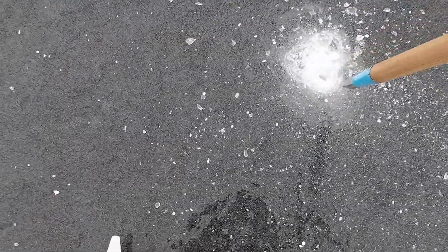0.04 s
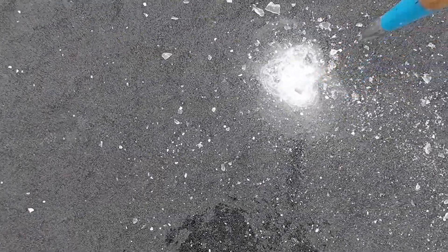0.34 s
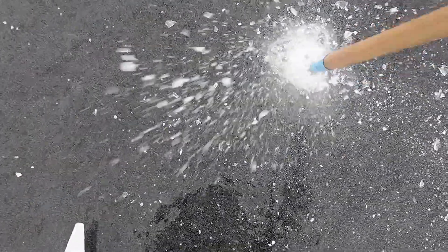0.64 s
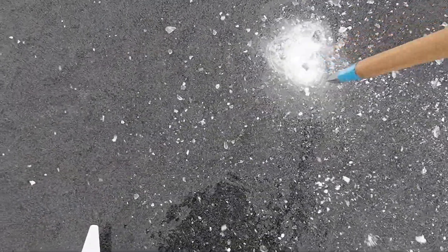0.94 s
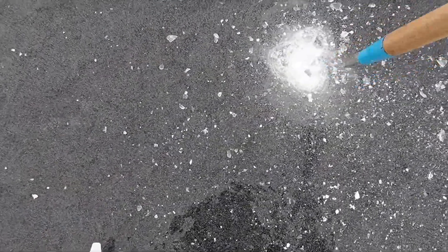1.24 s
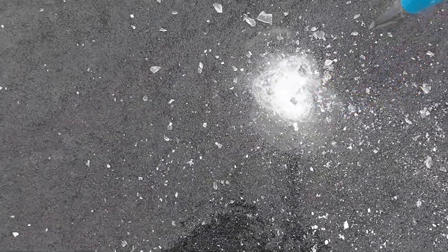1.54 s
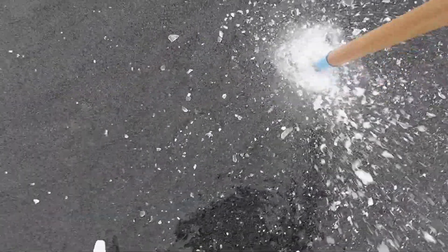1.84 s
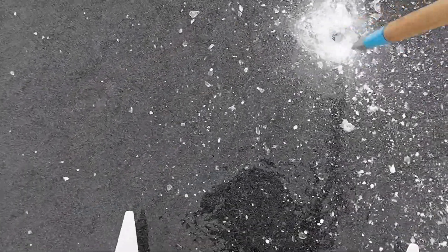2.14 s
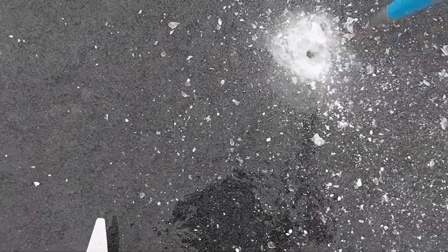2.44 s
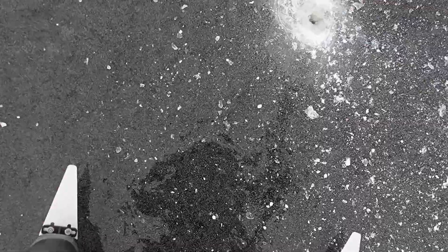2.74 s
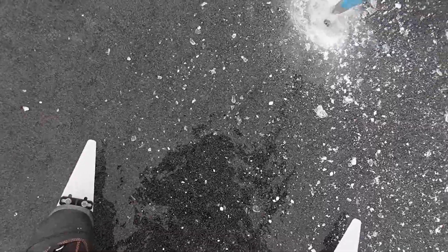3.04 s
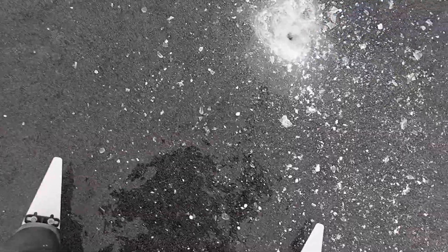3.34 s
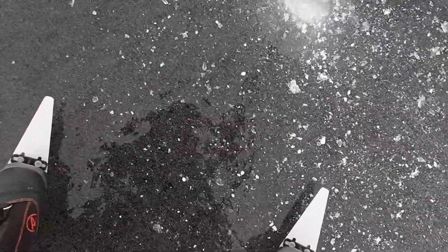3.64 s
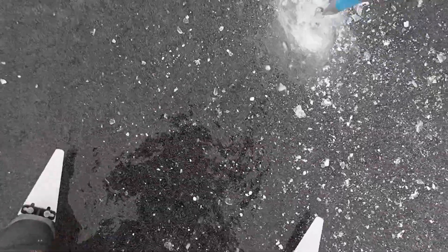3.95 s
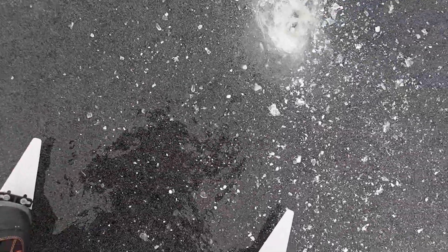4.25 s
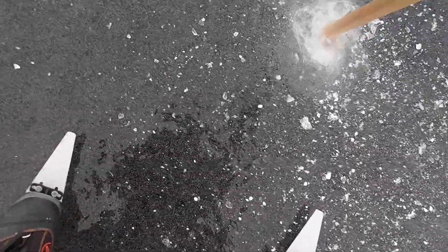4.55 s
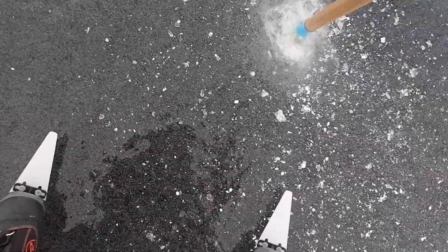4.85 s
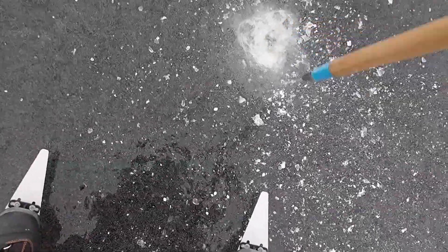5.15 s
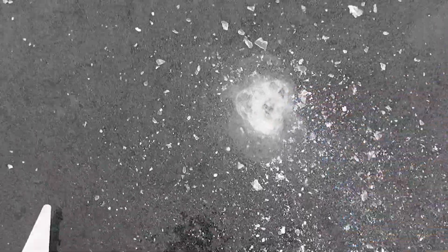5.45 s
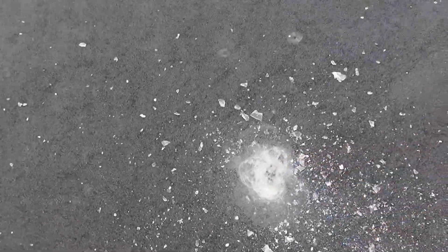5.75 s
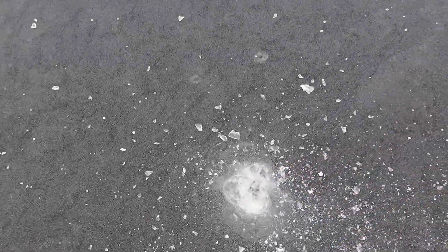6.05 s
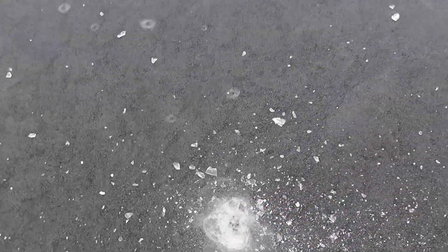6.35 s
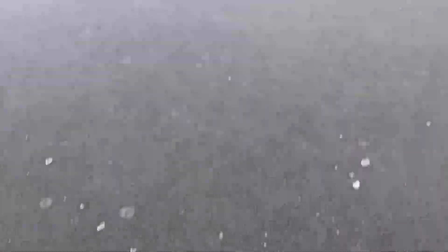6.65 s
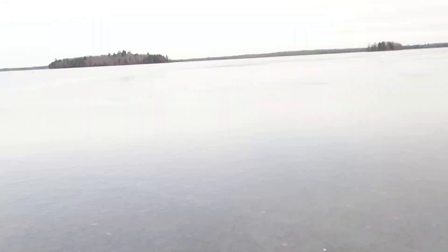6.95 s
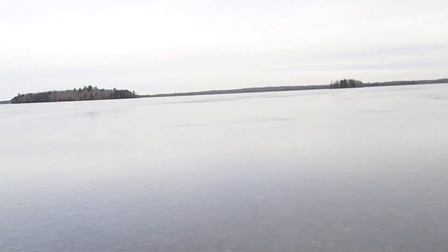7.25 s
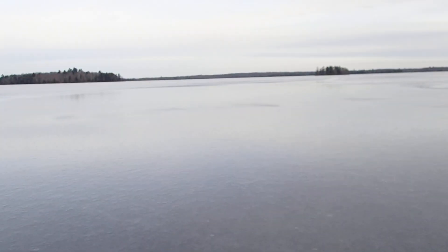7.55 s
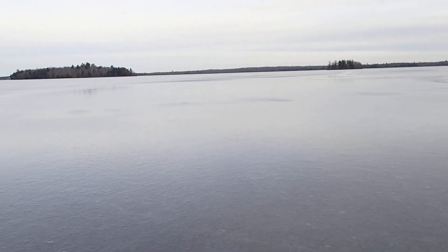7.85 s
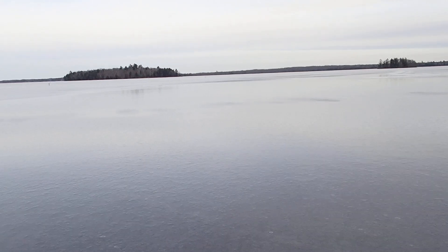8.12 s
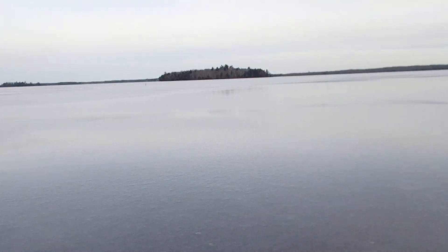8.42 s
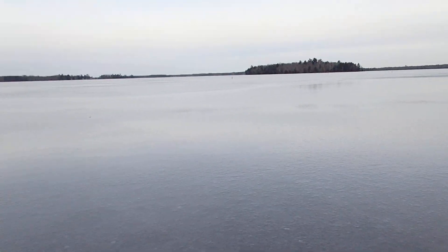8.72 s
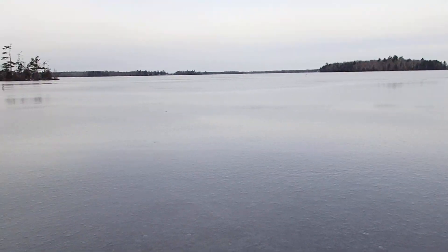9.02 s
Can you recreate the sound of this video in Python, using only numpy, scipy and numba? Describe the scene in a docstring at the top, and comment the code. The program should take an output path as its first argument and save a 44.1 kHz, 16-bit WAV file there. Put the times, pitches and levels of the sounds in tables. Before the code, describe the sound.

Close, sharp stabs of a wooden pole's steel tip crush lake ice, heard in stereo over light wind and a faint icy hiss. Between the blows the tip knocks and grinds in the hole while chips scatter and clink. After about six seconds come skate scuffs, then a low gust buffeting the microphones, and finally a short blade squeak with a crunch of ice.

```python
"""A light wind blows and lake ice hisses faintly. From 0.7 s to 5.9 s a steel-tipped wooden pole chops a
hole: each stab crushes the hard ice, cracked ice rings briefly, the tip knocks and grinds in the pit,
and chips tick away over the surface. From 6.3 s skates scuff, and near 7 s a long gust buffets the two
microphones of a small camera in a case. At 8.4 s a skate blade squeaks and its edge crunches the ice.
All along, the camera's gain control turns the sound down for a moment after each loud blow."""
import sys
import numpy as np
from scipy import signal
from scipy.fft import rfft, irfft
from scipy.io import wavfile
from scipy.ndimage import uniform_filter1d
from numba import njit

SR = 44100
rng = np.random.default_rng(int(sys.argv[2]) if len(sys.argv) > 2 else 0)


def inscribe(sig):
    """Save sig as 16-bit PCM at rate SR to the path in sys.argv[1].

    A 1-D sig is mono; a 2-D sig holds one channel per row.
    Samples are clipped to [-1, 1] before scaling.
    """
    pcm = np.round(np.clip(np.atleast_2d(sig).T, -1, 1) * 32767)
    wavfile.write(sys.argv[1], SR, pcm.astype(np.int16))


N = 400428
T = np.arange(N) / SR

# Table levels are relative: the functions add their own boosts. A fade is the time to drop by 60 dB.
# gusts of wind: (time of full strength [s], hold [s], level [dB])
GUST_TIMES = [(0.3, 0.086, -46.5), (0.549, 0.053, -31), (1.27, 0.022, -44.5), (1.53, 0.31, -44.5),
              (3.7, 0.46, -48), (4.688, 0.013, -37.5), (6.058, .7, -45.5), (6.373, 0.013, -35),
              (6.864, 1.526, -26.5), (8.399, 0.17, -33), (8.692, 0.2, -36)]
# loudness of the fine hiss over the ice: (time [s], level [dB])
HISS_LEVELS = [(0, -49), (.55, -42.5), (.95, -46), (1.3, -44), (2.1, -42), (2.6, -45), (4.1, -43.5),
               (4.95, -43), (5.3, -46), (6, -46.5), (6.35, -47), (6.9, -44), (7.55, -54.5), (8.35, -54),
               (8.65, -48.5), (9.08, -48)]
# skate blades scuffing: (middle time [s], half length [s], body level [dB], grit level [dB])
SKATE_SCUFFS = [(6.34, 0.046, -34.5, -26), (6.342, 0.0039, -14, -16.5), (6.65, 0.038, -33, -41),
                (8.412, 0.019, -27.5, -29), (8.49, 0.05, -35, -33.5), (8.63, 0.087, -30.5, -31.5),
                (8.72, 0.028, -42.5, -34.5), (8.86, 0.029, -34.5, -28)]
# ice crumbling under a skate's edge: (time [s], level [dB])
SKATE_CRUNCHES = [(8.4045, -35), (8.4148, -28.5), (8.4711, -27), (8.498, -30), (8.5754, -26.5),
                  (8.5884, -26), (8.616, -24.5), (8.633, -33), (8.643, -24), (8.6538, -28), (8.6802, -30.5)]
# chips that snap off or land close by: (time [s], level [dB], base fade [s])
NEAR_CHIPS = [(0.1096, -26, 0.0025), (0.166, -31.5, 0.0027), (0.4568, -30.5, .008), (1.0575, -28.5, 0.0066),
              (1.3547, -27, 0.0033), (1.3938, -29.5, .004), (1.62, -32.5, 0.0077), (1.9132, -27, 0.039),
              (1.9996, -4.5, 0.029), (2.0755, -15.5, 0.0057), (2.207, -24.5, 0.02), (2.233, -24.5, 0.0087),
              (2.469, -27.5, .004), (2.589, -31.5, 0.0097), (3.0321, -6, 0.011), (3.036, -12.5, 0.016),
              (3.166, -29, .004), (3.197, -26, 0.012), (5.823, -11, 0.029)]
# notes of the flat shards that clink as they land: (pitch [Hz])
SHARD_PITCHES = [1600, 1704, 1850, 2064]
# the tip grinding in the pit: (middle time [s], half length [s], body level [dB], grit level [dB])
TIP_SCRAPES = [(0.868, 0.0043, -30, -4.5), (2.06, 0.029, -49, -20.5), (2.14, 0.0078, -27.5, -33),
               (2.997, 0.036, -31, -26), (3.69, 0.039, -26, -20.5), (3.83, 0.015, -31.5, -27),
               (4.03, 0.044, -30, -28), (4.52, .022, -12, -7.5), (4.58, 0.038, -28, -27.5),
               (4.845, 0.039, -26, -22), (5.52, 0.032, -40, -32), (5.633, 0.03, -19, -23)]
# light knocks of steel and loose lumps on the ice:
# (time [s], body level [dB], body pitch [Hz], fade [s], crack level [dB])
LIGHT_KNOCKS = [(0.6476, -25, 1430, 0.0032, -30), (0.7115, -24, 1340, 0.0028, -35),
                (0.734, -21, 1150, 0.044, -36), (0.7829, -20, 1200, 0.034, -28),
                (0.8666, -21, 1230, 0.11, -30), (0.9069, -16.5, 1430, 0.005, -23),
                (1.0715, -30, 920, 0.02, -33), (1.199, -39.5, 1320, 0.014, -25.5),
                (1.2252, -32.5, 990, 0.026, -31.5), (1.3137, -36, 1160, .009, -32),
                (1.7748, -26, 940, 0.0057, -41), (1.8616, -26, 1120, 0.021, -50),
                (1.8746, -24, 476, 0.025, -27), (2.1958, -31.5, 1540, 0.01, -21),
                (2.9557, -19, 1320, .033, -25), (2.9666, -18.5, 1400, 0.048, -25.5),
                (2.9762, -14, 1470, .024, -15.5), (3.066, -30, 1040, .018, -33),
                (3.101, -26.5, 1070, 0.058, -43), (3.3445, -36.5, 690, .014, -54),
                (3.6626, -14, 1420, 0.046, -8), (3.7076, -19.5, 1560, 0.033, -13),
                (3.8455, -15.5, 925, 0.024, -45), (4.0293, -22.5, 1340, 0.033, -17.5),
                (4.07, -27.5, 1020, 0.024, -29.5), (4.0963, -26, 1000, .013, -52),
                (4.4935, -11, 990, 0.036, -19), (4.5437, -22, 940, 0.057, -41),
                (4.6869, -23.5, 1080, 0.18, -30), (4.6946, -21.5, 1020, 0.0081, -42),
                (4.7899, -25, 1310, 0.032, -48), (4.8668, -19, 950, 0.058, -21.5),
                (4.8784, -18.5, 990, 0.037, -20.5), (4.9525, -31, 1750, 0.054, -27),
                (5.2515, -33.5, 744, 0.016, -46), (5.5082, -27, 1200, 0.037, -36),
                (5.5729, -11, 1490, 0.031, -36), (5.6304, -17, 1220, 0.028, -45),
                (5.6418, -15, 1390, 0.025, -30), (6.2963, -31.5, 1200, 0.036, -53),
                (6.3424, -22, 1460, 0.028, -22), (6.6235, -29, 790, 0.009, -45),
                (7.0675, -36.5, 1030, 0.0031, -29)]
# brief ringing notes of cracked ice and, at 8.4 s, a squeaking skate blade:
# (time [s], pitch [Hz], starting level [dB], fade [s])
RINGING_NOTES = [(0.657, 1267, -2.5, 0.045), (0.7345, 1236, -28, 0.098), (0.7978, 1228, -10, 0.097),
                 (0.8137, 990, -23, 0.33), (1.644, 1640, -32.5, 0.084), (1.808, 940, -12.5, 0.11),
                 (2.876, 893, -10.5, 0.087), (2.878, 1196, -13, 0.065), (4.878, 725, -28, 0.21),
                 (5.855, 2070, -3, 0.024), (8.414, 1302, -21, 0.055)]
# stabs of the tip: (time [s], body level [dB], body pitch [Hz], base body fade [s],
# crack level [dB], base crack fade [s], chip shower level [dB])
STABS = [(0.6554, -12.5, 1230, 0.084, -7.5, 0.023, -50), (0.7974, -16.5, 1350, 0.077, -32, 0.018, -52),
         (0.813, -14, 1460, 0.081, -24, 0.024, -33.5), (1.8067, -11.5, 1400, 0.065, -15, 0.03, -28.5),
         (2.8747, -11, 1420, 0.055, -14.5, 0.032, -41), (3.6564, -12, 1370, 0.048, -13.5, 0.014, -43),
         (4.4853, -16, 910, 0.043, -23.5, 0.04, -60), (4.5057, -10, 1380, 0.1, -24, 0.044, -59),
         (4.5267, -15.5, 1180, 0.034, -20, 0.021, -58), (5.5622, -15.5, 1500, 0.081, -14, 0.016, -70),
         (5.8548, -9.5, 1540, 0.011, -24, 0.029, -68.5)]
# notes at which the pole and the pit ring: (pitch [Hz], width [Hz], level [dB])
POLE_AND_PIT_NOTES = [(930, 13, -10), (1193, 28, -7), (1567, 28, -7), (1964, 75, -4.5)]

# Each tone says how strong the low and high parts of a sound are: (frequency [Hz], level [dB])
WIND_TONE = [(12, -26), (20, -31.5), (65, -1), (170, -3.5), (218, -6), (264, -9), (436, -17), (597, -23),
             (663, -33), (853, -27.5), (1740, -49), (1890, -59), (2430, -116), (3000, -111), (3900, -102),
             (6600, -120)]  # air rumbling on the case
HISS_TONE = [(2000, -3.5), (3300, -21.5), (4200, -3), (5000, 3), (5900, 9), (7200, 1.5), (8800, 7.5),
             (9700, 0), (10700, -18), (16000, -19)]  # fine hiss over the ice
SHEET_TONE = [(150, -9.5), (500, 2.5), (700, -5), (950, 1.5), (1300, -1), (1900, -1.5), (2300, -16.5),
              (3200, -18.5), (6000, -62)]  # the dull ice sheet
BLADE_TONE = [(300, 2), (700, -4.5), (1050, 4), (1350, 7.5), (1650, -3.5), (2000, 8), (2350, -7),
              (2850, -14), (3400, -21), (4200, -11.5), (5500, -0.5), (7000, -12), (9300, -15), (10800, -34)]  # a skate blade
CHIP_TONE = [(1000, -17), (2000, -14.5), (3300, -29), (4500, -9.5), (5600, -1), (7200, -4), (8600, 3.5),
             (9600, -1), (10500, -14.5), (16000, -23)]  # small hard chips
THUD_TONE = [(100, -25.5), (400, -4), (700, -8), (940, -2.5), (1250, -3.5), (1600, -3), (2000, -8),
             (2400, -15), (3300, -22.5), (5000, -10), (9000, -60)]  # woody thud of pole and sheet
CRACK_TONE = [(1000, -61), (2500, -14), (3300, -15.5), (4300, -5.5), (5200, 2), (6200, 1.5), (7500, -2),
              (9000, 1), (10000, -11), (11000, -23.5), (16000, -34.5)]  # ice breaking
SHADOW_TONE = [(1500, -0.5), (2400, 6), (4100, -12), (5600, -3.5), (7200, -12.5), (9000, -12.5),
               (12000, -13)]  # what the case does to sound on the left microphone's side

GUST_RISE_DB_PER_S, GUST_FALL_DB_PER_S = 230, 102
CHIP_FLIGHT_S, LANDING_DB_PER_S, SETTLE_DB_PER_S = 0.29, 72, 35


def undb(db):
    """Turn decibels into a factor to multiply by."""
    return 10 ** (np.asarray(db) / 20)


def unit(x):
    """Scale a sound to an average (rms) level of 1."""
    return x / np.sqrt(np.mean(x ** 2) + 1e-20)


def burst(x, db):
    """Give a short sound the energy of 10 ms at the given level."""
    return x * undb(db) / np.sqrt(np.sum(x ** 2, axis=-1, keepdims=True) / (SR / 100) + 1e-20)


def add(track, s, sound):
    """Lay a sound into a track, starting at s seconds."""
    i = int(s * SR)
    track[i:i + len(sound)] += sound[:N - i]


def pan(x, left_db):
    """Make two channels, the left stronger than the right by left_db."""
    return x * undb(np.array([[left_db], [-left_db]]) / 2)


def colour(x, tone, centre_hz=None, focus_db=0, size=2048):
    """Filter a sound with a tone table; pitches far from centre_hz drop by focus_db."""
    hz, db = np.transpose(tone)
    octave = np.log2(np.maximum(np.fft.rfftfreq(size, 1 / SR), 1))
    gain_db = np.interp(octave, np.log2(hz), db)
    if centre_hz:
        gain_db = gain_db - focus_db * np.tanh((octave - np.log2(centre_hz)) ** 2)
    # build the filter so that it rings only after a hit, never before
    cepstrum = irfft(np.log(undb(gain_db)))
    cepstrum[1:size // 2] *= 2
    cepstrum[size // 2 + 1:] = 0
    return signal.fftconvolve(x, irfft(np.exp(rfft(cepstrum))))[:len(x)]


def wander(per_s):
    """A smooth random curve, about 1 in size, that heads for a new value per_s times a second."""
    hold = int(SR / per_s)
    steps = np.repeat(rng.standard_normal(N // hold + 1), hold)
    return unit(uniform_filter1d(uniform_filter1d(steps, hold), hold)[:N])


def swell(s, hold_s, db, rise_db_per_s, fall_db_per_s):
    """Power that rises to a level at time s, holds and dies away."""
    below_db = rise_db_per_s * np.maximum(s - T, 0) + fall_db_per_s * np.maximum(T - s - hold_s, 0)
    return undb(db - np.minimum(below_db, 100)) ** 2


def grains(n, per_s, spread_db):
    """Tiny breaks click at random moments, a few much louder than the rest."""
    sizes = undb(spread_db * np.minimum(rng.exponential(size=n), 5)) * rng.choice([-1, 1], n)
    return sizes * (rng.random(n) < per_s / SR)


def fracture(fade_s, first, size=6000):
    """Ice gives way: one break of strength `first`, then a dying run of small ones."""
    clicks = unit(grains(size, 7000, 2.5)) * undb(-60 * np.arange(size) / SR / max(fade_s, .002))
    clicks[0] += first * np.sqrt(np.sum(clicks ** 2))
    return clicks


def resonate(x):
    """The pole and the pit ring on after each push."""
    return x + sum(undb(db) * signal.lfilter(*signal.iirpeak(hz, hz / width, fs=SR), x)
                   for hz, width, db in POLE_AND_PIT_NOTES)


def case(x, left_db, scatter, fade_s=0.0013, size=256):
    """High sounds bounce around in the camera case, which shadows the left microphone."""
    paths = rng.standard_normal((2, size)) * undb(-60 * np.arange(size) / SR / fade_s)
    shares = scatter * np.array([[1], [.5]])
    paths *= shares / np.sqrt(np.sum(paths ** 2, axis=1, keepdims=True))
    paths[:, 0] = 1  # the direct path
    left, right = (signal.fftconvolve(x, path)[:N] for path in paths / np.sqrt(1 + shares ** 2))
    return np.array([colour(left, SHADOW_TONE) * undb(left_db), right])


def wind():
    """Swirls of air buffet the case, which carries much the same rumble to both microphones."""
    gusts = sum(swell(*gust, GUST_RISE_DB_PER_S, GUST_FALL_DB_PER_S) for gust in GUST_TIMES)
    breeze = undb(-48.5 + 2.3 * wander(5.67)) ** 2
    wind_db = 10 * np.log10(gusts + breeze) + 1.13 * wander(16)
    shared, left, right = (unit(colour(rng.standard_normal(N), WIND_TONE, size=8192)) for _ in range(3))
    air = shared + undb(-10.5) * np.array([left, right])
    deep = signal.sosfilt(signal.butter(1, 110, fs=SR, output="sos"), air)
    # big swirls grow with strong gusts; the small ones sputter quickly
    big_swirls = deep * np.clip((wind_db + 56.5) / 18, .2, 1)
    small_swirls = (air - deep) * undb(2.8 * wander(140) - .8)
    return pan(big_swirls + small_swirls, -4.0) * undb(wind_db + 2.0)


def hiss_level():
    """The hiss's base level in dB at every moment, in straight lines between the table's rows."""
    return np.interp(T, *np.transpose(HISS_LEVELS))


def ice_hiss():
    """Sliding chips hiss and the ice sheet murmurs; the two rise and fall together."""
    level_db = hiss_level()
    hiss = unit(colour(rng.standard_normal(N), HISS_TONE))
    hiss *= undb(level_db + 4 + 0.88 * wander(40) + 0.61 * wander(9))
    murmur = unit(resonate(colour(grains(N, 2500, 0.78), SHEET_TONE)))
    murmur *= undb(level_db - 7 + 3.5 * wander(50))
    left_hiss = unit(colour(rng.standard_normal(N), HISS_TONE, 2400, focus_db=3)) * undb(level_db + 0.5)
    return case(hiss, left_db=-4.0, scatter=0.26) + left_hiss * np.array([[1], [0]]) + pan(murmur, 0.37)


def skate_crunches(fade_s=0.015, grit_db=-8):
    """A skate's edge breaks off bits of ice; each break rings the blade."""
    body, grit = np.zeros((2, N))
    for s, db in SKATE_CRUNCHES:
        add(body, s, burst(colour(fracture(fade_s, first=0.63), BLADE_TONE), db))
        add(grit, s, burst(colour(fracture(fade_s, first=0.25), CRACK_TONE), db + grit_db))
    return pan(body, .4) + case(grit, left_db=0.0, scatter=1.0)


def scrape(strokes, tone, grains_per_s, spurts_db):
    """Dragged steel, a skate or the pole's tip, breaks off grains of ice in uneven spurts."""
    body_level, grit_level = np.zeros((2, N))
    for s, half_s, body_db, grit_db in strokes:
        stroke = np.exp(-np.minimum(((T - s) / half_s) ** 2, 50))
        body_level += stroke * undb(body_db)
        grit_level += stroke * undb(grit_db)
    spurts = undb(spurts_db * wander(160))
    body = body_level * unit(resonate(colour(spurts * grains(N, grains_per_s, 3.2), tone)))
    grit = grit_level * unit(colour(spurts * grains(N, 6000, 4.0), CRACK_TONE, 6900, focus_db=2))
    return pan(body, .5) + case(grit, left_db=-5.0, scatter=1.0)


def shower_power():
    """Chips thrown by each stab fly, land in a shower, then hop to rest."""
    return sum(swell(s + CHIP_FLIGHT_S, 0, db, LANDING_DB_PER_S, SETTLE_DB_PER_S) for s, *_, db in STABS)


def shards(fade_s=0.051, clink_db=-14):
    """Flat shards in the shower ring each time they hop."""
    clinks, t = np.zeros(N), T[:SR // 5]
    shower = np.sqrt(shower_power())
    for hz in SHARD_PITCHES:
        ring = undb(-60 * t / fade_s) * np.sin(2 * np.pi * hz * t)
        hops = unit(grains(N, per_s=3, spread_db=2.3)) * shower
        clinks += signal.fftconvolve(hops, ring / np.linalg.norm(ring))[:N]
    return pan(clinks * undb(clink_db) / np.sqrt(len(SHARD_PITCHES)), .4)


def chips():
    """Small hard chips tick, close by and in showers; heavier lumps tap the ice sheet dully."""
    near = np.zeros(N)
    for s, db, fade_s in NEAR_CHIPS:
        own_hz = 8000 * 2 ** rng.uniform(-0.46, 0.47)  # smaller chips tick higher
        tick = colour(fracture(fade_s + 0.0055, first=0.75), CHIP_TONE, own_hz, focus_db=15)
        add(near, s, burst(tick, db))
    strays = undb(hiss_level() - 6.5) ** 2  # a few chips tick all the time
    spray_db = 10 * np.log10(shower_power() + strays)
    spray = sum(unit(colour(grains(N, per_s=28, spread_db=3.5), CHIP_TONE, hz, focus_db=8))
                for hz in (6250, 7600, 8900, 8900, 10100))
    lumps = sum(unit(colour(grains(N, per_s=14, spread_db=2.2), SHEET_TONE, hz, focus_db=14))
                for hz in (650, 1100, 1750))
    ticks = undb(7) * near + unit(spray) * undb(spray_db + 8.0)
    taps = unit(lumps) * undb(0.5 * spray_db - 29)
    return case(ticks, left_db=-2.5, scatter=0.9) + pan(taps, 0.51)


def knocks():
    """Steel and loose lumps knock lightly on the ice, each with its own hollow pitch."""
    body, crack = np.zeros((2, N))
    for s, body_db, hz, fade_s, crack_db in LIGHT_KNOCKS:
        thud = colour(fracture(fade_s, first=0.36), THUD_TONE, hz, focus_db=14)
        add(body, s, burst(resonate(thud), body_db))
        add(crack, s, burst(colour(fracture(fade_s, first=0.44), CRACK_TONE), crack_db))
    return undb(1.0) * (pan(body, 0.25) + case(crack, left_db=-4.5, scatter=0.84))


def ringing_notes():
    """Cracked ice rings briefly and, at 8.4 s, a skate blade squeaks: one fading note each."""
    rings, t = np.zeros(N), T[:16000]
    for s, hz, db, fade_s in RINGING_NOTES:
        add(rings, s, undb(db - 60 * t / fade_s) * np.sin(2 * np.pi * hz * t))
    return pan(rings, -.4)


def stabs():
    """The tip crushes the ice: a bright crack over the woody thud of pole and sheet."""
    body, crack = np.zeros((2, N))
    for s, body_db, hz, body_fade_s, crack_db, crack_fade_s, _ in STABS:
        thud = colour(fracture(body_fade_s * 0.76, first=0.12), THUD_TONE, hz, focus_db=8)
        add(body, s, burst(resonate(thud), body_db))
        snap = burst(fracture(0.0052, first=0.063), -0.58)
        crumble = burst(fracture(crack_fade_s * 1.9, first=0), 0)
        add(crack, s, burst(colour(snap + crumble, CRACK_TONE), crack_db + 9.0))
    return pan(body, -0.66) + case(crack, left_db=-3.5, scatter=0.69)


def scene(boost_db=5, left_lag_samples=2.5):
    """Mix pole, chips, skates and wind; the sound reaches the left microphone a moment later."""
    stabs_and_notes = undb(boost_db) * (stabs() + ringing_notes())
    grinding = scrape(TIP_SCRAPES, THUD_TONE, grains_per_s=2300, spurts_db=2.0)
    scuffing = scrape(SKATE_SCUFFS, BLADE_TONE, grains_per_s=1000, spurts_db=5.5)
    foreground = stabs_and_notes + grinding + knocks() + chips() + shards()
    left, right = foreground + scuffing + skate_crunches() + ice_hiss() + wind()
    delay = np.exp(-2j * np.pi * np.fft.rfftfreq(N) * left_lag_samples)
    return np.array([irfft(rfft(left) * delay, N), right])


@njit
def follow(x, attack, release):
    """Track the loudness: rise at the attack rate, fall at the release rate."""
    levels, level = np.empty(len(x)), 0.
    for i in range(len(x)):
        level += (x[i] - level) * (attack if x[i] > level else release)
        levels[i] = level
    return levels


def record(dry, attack_s=0.0025, release_s=0.14, duck_above_db=-12, noise_db=-56, top_hz=15900):
    """The camera adds faint hiss, turns loud moments down, flattens peaks and cuts the highest treble."""
    sound = dry + undb(noise_db) * rng.standard_normal((2, N))
    loudness = follow(np.abs(sound).max(axis=0), 1 / (attack_s * SR), 1 / (release_s * SR))
    gain = np.minimum(1, undb(duck_above_db) / (loudness + 1e-9)) ** 0.4
    clipped = np.clip(sound * gain, -1, 1)
    return signal.sosfilt(signal.ellip(8, .2, 70, top_hz, fs=SR, output="sos"), clipped)


dry = scene()
out = record(dry)
inscribe(out)
```